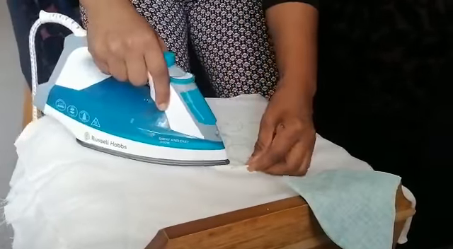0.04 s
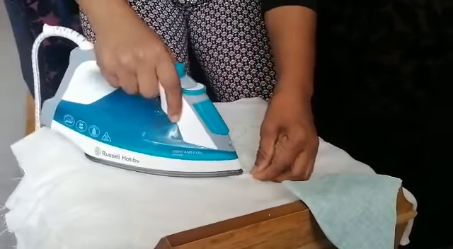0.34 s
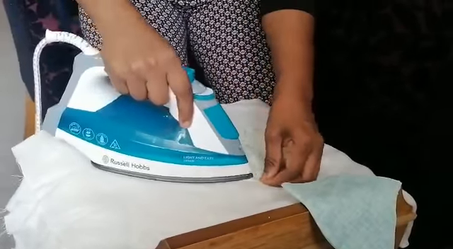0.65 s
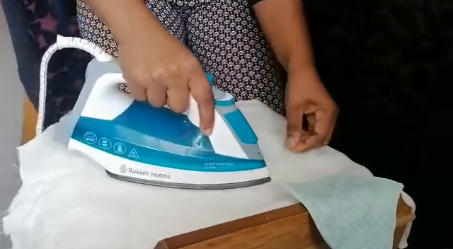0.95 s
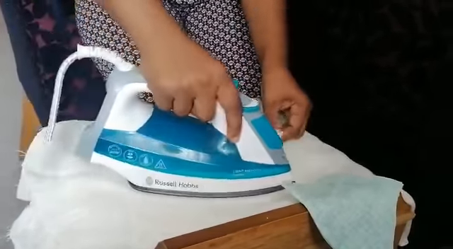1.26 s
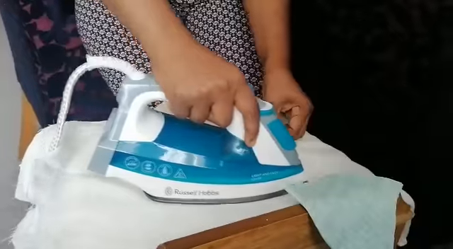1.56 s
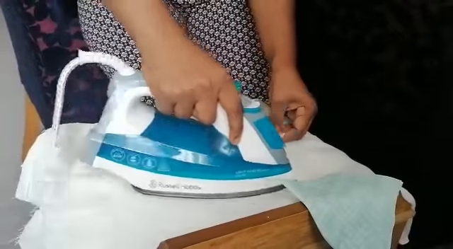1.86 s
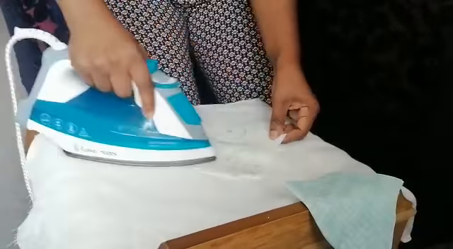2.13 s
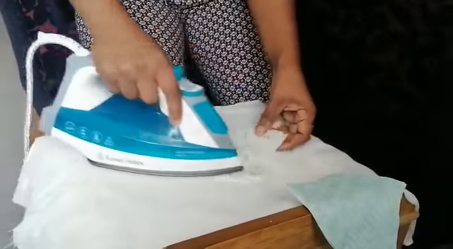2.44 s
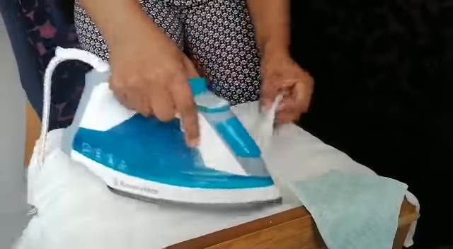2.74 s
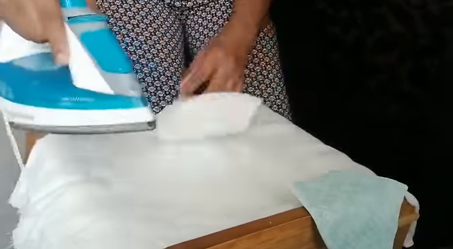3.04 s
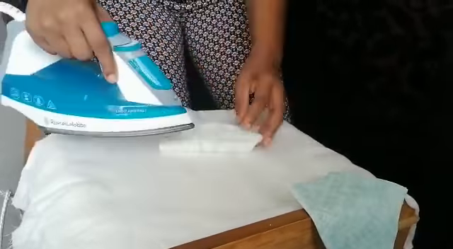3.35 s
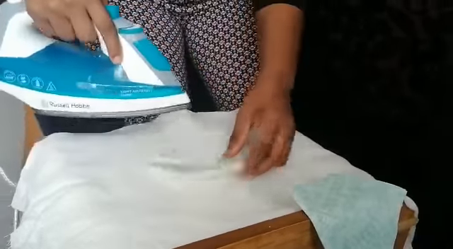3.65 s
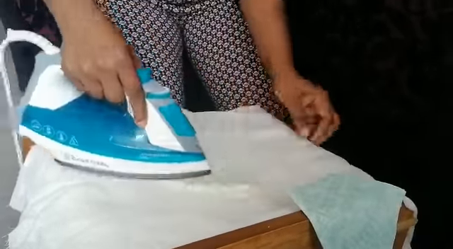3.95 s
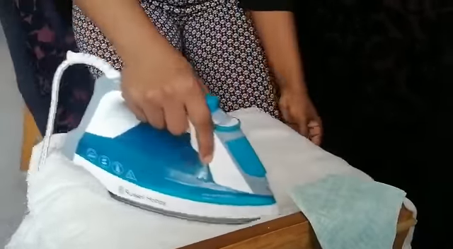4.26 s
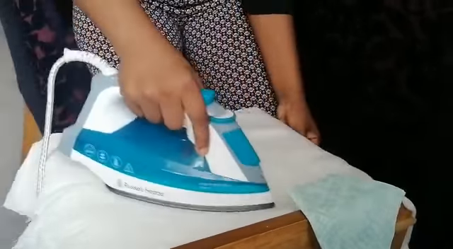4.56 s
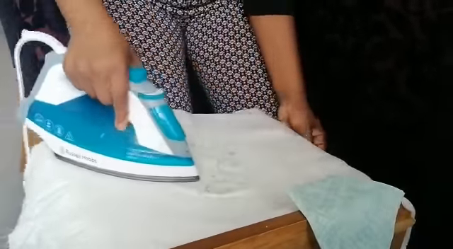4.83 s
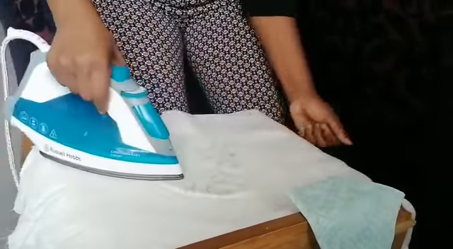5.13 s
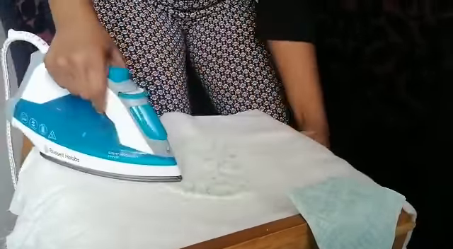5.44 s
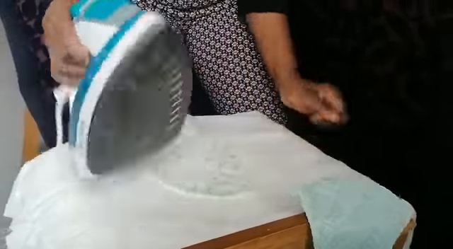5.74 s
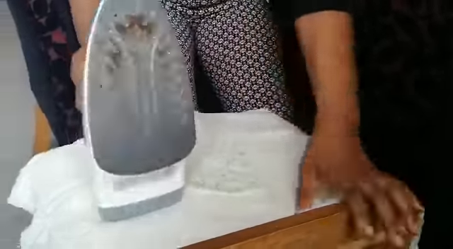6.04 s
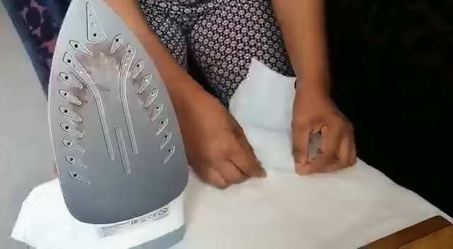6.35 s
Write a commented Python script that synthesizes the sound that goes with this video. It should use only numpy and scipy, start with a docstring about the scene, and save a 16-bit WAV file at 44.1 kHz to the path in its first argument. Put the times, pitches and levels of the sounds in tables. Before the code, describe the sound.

Faint swishes of ironing and small plastic ticks, with a dull thump, a sharp wooden knock and a final rattle in a small room.

```python
"""A steam iron hisses over cloth in strokes, by friction, above a constant low rumble and faint whine.
Impacts excite damped modes: the plastic shell clacks and ticks, and the padded wooden board thumps
as the iron lands. Late on, the iron bangs on hard wood and judders onto its heel; two dry snaps follow.
The sound is picked up close by, on a phone, with the short reverberation of a small room."""
import sys
import numpy as np
from scipy import signal
from scipy.fft import rfft, irfft
from scipy.io import wavfile
from scipy.ndimage import uniform_filter1d

SR = 44100
rng = np.random.default_rng(int(sys.argv[2]) if len(sys.argv) > 2 else 0)


def master(y):
    """Save y as 16-bit WAV."""
    cut = np.clip(np.atleast_2d(y).T, -1, 1)
    pcm = np.round(cut * 32767)  # scale
    wavfile.write(sys.argv[1], SR, pcm.astype(np.int16))


N = 281975
TIME = np.arange(N) / SR
AGE = TIME[:SR // 2]  # time since an impact, s

# spectra of the room tone and of cloth friction: f/Hz, relative spectral level/dB
ROOM_SPECTRUM = [(20, -8), (47, 3), (64, -2), (125, -15.5), (180, -6.5), (240, -18.5), (300, -11),
                 (450, -23), (1020, -15.5), (1300, -25), (1900, -28), (2700, -31), (4000, -36.5),
                 (7500, -45)]
CLOTH_SPECTRUM = [(500, -19), (1000, 6), (1800, -14.5), (2250, 0.5), (2700, 5.5), (3300, 3), (4700, -2.5),
                  (5500, 1.5), (7000, -5.5), (8000, -35)]
# tracks of the thin whine, the falling squeak and the fizz around the snaps: t/s, f/Hz, level/dB
WHINE_TRACK = [(0, 2192, -78.5), (6.07, 2214, -83), (6.10, 2130, -78), (6.39, 2130, -71)]
SQUEAK_TRACK = [(3.04, 1644, -80), (3.12, 1617, -67), (3.18, 1480, -65.5), (3.25, 1427, -77)]
FIZZ_TRACK = [(6.083, 3950, -52), (6.125, 4000, -61.5), (6.16, 3930, -81)]

# normal modes of each struck body: f/Hz, relative level/dB, 60 dB decay time/s
CLICK_MODES = [(2046, -14, 0.016), (2750, 5, 0.0053), (2950, 3.5, 0.0058), (3440, -13, 0.0048),
               (6700, 8, 0.002)]
SNAP_MODES = [(547, -5.5, 0.0094), (865, 6, 0.0058), (1700, 4.5, 0.0078), (1770, 4, 0.0034),
              (3770, -4, 0.0064), (4340, -12, 0.0069)]
HEEL_MODES = [(130, -2, 0.043), (280, 13.5, 0.019), (471, 5.5, 0.056), (674, 5, 0.027), (814, 2.5, 0.042),
              (930, -18, 0.026)]
SHELL_MODES = [(296, 1, 0.056), (381, -2, 0.021), (445, 4.5, 0.028), (618, -2, 0.03), (690, 7.5, 0.016),
               (880, 4.5, 0.045), (1043, 0.5, 0.077), (1380, 7, 0.012), (1844, 1.5, 0.035),
               (2030, 2.5, 0.023), (2544, -13.5, 0.23), (3180, -10.5, 0.026), (4044, -2, 0.016),
               (5050, -25, .04)]
WOOD_MODES = [(206, -12, 0.2), (267, -10, 0.24), (326, 8, 0.036), (443, 10, 0.026), (465.4, -21, 0.13),
              (548, -12, 0.089), (750, -16.5, 0.13), (755, -1, 0.027), (1016, -14.5, 0.12),
              (1165, -20.5, 0.033), (1554, -23.5, 0.19), (1712, 0.5, 0.025), (2070, -4, 0.027)]
BOARD_MODES = [(117.6, 1.5, 0.3), (161.8, 1.5, 0.15), (207.2, -8, 0.25), (265, 4, 0.14)]

# a small dry click: t/s, level/dB
CLICKS = [(0.8394, -47.5)]
# dry snaps: t/s, relative level/dB
SNAPS = [(6.0945, -13.5), (6.1145, -20)]
# strokes of the soleplate over the cloth: start t/s, fastest t/s, end t/s, hiss level/dB
STROKES = [(-.15, 0.154, 1.1, -74.5), (0.893, 1.118, 1.29, -63.5), (1.22, 1.523, 1.87, -69),
           (1.72, 2.178, 2.75, -70), (2.253, 2.53, 2.9, -70), (4.01, 4.044, 4.8, -65),
           (4.35, 4.803, 5.21, -71.5), (5.123, 5.29, 5.55, -75.5), (5.526, 5.64, 5.81, -66.5),
           (5.88, 5.95, 6.05, -60)]
# creaking of the handle as it is steered or tipped: start t/s, end t/s, tick rate/Hz, level/dB
CREAKS = [(1.402, 3.35, 5, -67), (5.609, 5.73, 70, -56)]
# short pitched ticks, some alone, some with a clack: t/s, level/dB, f/Hz, grit re tone/dB
TICKS = [(1.287, -43, 690, -14), (1.371, -45.5, 950, -13), (1.488, -53.5, 2870, -23),
         (1.856, -61.5, 3100, -20), (2.291, -44, 3290, -18), (2.292, -43, 1114, -24),
         (2.318, -46, 2430, -14.5), (2.687, -48.5, 1980, -13), (2.705, -54, 4720, -18),
         (2.932, -59.5, 3350, -30), (2.997, -60, 4850, -4), (3.163, -61.5, 4070, 0), (4.026, -50, 3900, -5),
         (4.479, -52.5, 2160, -30), (5.010, -43, 472, -32.5), (5.607, -50.5, 1470, -7),
         (5.641, -46, 1720, -1.5), (5.715, -51.5, 2640, -20), (5.809, -56.5, 2870, -8.5),
         (5.865, -43.5, 2950, -35), (5.909, -42.5, 3700, -12), (5.917, -40, 2510, -25),
         (5.936, -47.5, 5040, -4), (6.054, -44.5, 2760, -7)]
# shell clacks; harder contact is brighter, a loose part lifts the middle registers:
# t/s, base level/dB, tilt per register/dB, middle lift/dB
CLACKS = [(1.287, -50, -4, 0), (1.295, -38.5, 2.5, -3), (1.301, -49, 0.5, -4), (1.384, -57.5, 1.5, 1.5),
          (1.786, -60, -3.5, -1.5), (2.292, -59, 1, 13), (2.317, -51.5, 1.5, 4.5), (2.698, -48.5, -3.5, -4),
          (2.715, -55, -0.5, 5.5), (2.741, -57.5, -8, 5), (2.907, -72.5, -11, 5.5), (3.091, -64.5, -7, -5),
          (3.133, -68, -8.5, 7), (5.008, -52.5, -2, -5), (5.861, -56, -7, 0.5), (5.906, -39, -1.5, -12),
          (5.927, -48.5, -8, 0.5)]
# hard blow on the wood: t/s, level of the modes/dB
BANGS = [(5.4144, -19.5)]
# soft landings on the padding: t/s, level/dB, f/Hz
LANDINGS = [(1.35, -48.5, 274), (1.383, -46.5, 246), (1.797, -52, 244), (2.127, -54, 173),
            (4.025, -19, 239), (4.403, -45.5, 283), (5.902, -30.5, 132)]

# boundaries between the four registers: f/Hz
BAND_EDGES_HZ = [600, 1400, 3200]
# the shell's own balance in those registers, low to high: relative level/dB
SHELL_BALANCE_DB = [-1.1, -0.77, 1, -2.8]
TOP_HZ = 7450


def amp(db):
    """Amplitude ratio of a level in decibels."""
    return 10 ** (np.asarray(db) / 20)


def level(x, db):
    """Normalisation to an rms level."""
    return x * amp(db) / np.sqrt(np.mean(x ** 2))


def peak(x, db):
    """Normalisation to the rms level of the loudest 4 ms."""
    power = uniform_filter1d(x ** 2, size=SR // 250, mode="constant")
    return x * amp(db) / np.sqrt(power.max())


def add(out, s, x):
    """Superposition of a sound starting at time s."""
    start = int(s * SR)
    out[start:start + len(x)] += x[:N - start]


def colour(x, points):
    """Spectral shaping by (f/Hz, level/dB) points, interpolated in log frequency."""
    hz, db = np.transpose(points)
    bins = np.maximum(np.fft.rfftfreq(len(x), 1 / SR), 1)
    return irfft(rfft(x) * amp(np.interp(np.log(bins), np.log(hz), db)), len(x))


def butter(x, hz, kind, order=2):
    """Causal filtering with a maximally flat passband."""
    return signal.sosfilt(signal.butter(order, hz, kind, fs=SR, output="sos"), x)


def registers(x):
    """Band splitting into four registers, low to high."""
    low, mid, high = BAND_EDGES_HZ
    upper = [butter(x, band, "band", order=3) for band in ([low, mid], [mid, high], [high, TOP_HZ])]
    return [butter(x, low, "low", order=4)] + upper


def fade(t60):
    """Exponential decay, 60 dB in t60 seconds."""
    return np.exp(-np.log(1000) * AGE / t60)


def walk(rate_hz):
    """Slow random modulation: linear interpolation between Gaussian values."""
    steps = rng.standard_normal(N // 100)
    return 0.55 * np.interp(TIME * rate_hz, np.arange(len(steps)), steps)


def ring(modes, detune=0):
    """Free vibration as a sum of damped modes; the grip detunes them slightly."""
    return sum(amp(db) * fade(t60) * np.sin(2 * np.pi * hz * (1 + detune * rng.standard_normal()) * AGE)
               for hz, db, t60 in modes)


def taps(events, modes, rise_s, detune=0):
    """Impact excitation: each blow rings the same modes with a finite rise time."""
    out = np.zeros(N)
    for s, db in events:
        add(out, s, peak(ring(modes, detune) * (1 - fade(rise_s)), db))
    return out


def wavering(track, width_hz, steady=0):
    """Narrow-band noise: a gliding carrier, randomly modulated, with an optional steady core."""
    s, hz, db = np.transpose(track)
    phase = 2 * np.pi * np.cumsum(np.interp(TIME, s, hz)) / SR
    flutter = butter(rng.standard_normal(N) + 1j * rng.standard_normal(N), width_hz / 2, "low")
    tone = np.real((steady + flutter / np.std(flutter)) * np.exp(1j * phase))
    gain = amp(np.interp(TIME, s, db, left=-np.inf, right=-np.inf))
    return level(tone, 0) * gain


def room_tone():
    """Ambient noise: rumble and rush, independently modulated in amplitude, with a thin whine."""
    air = colour(rng.standard_normal(N), ROOM_SPECTRUM)
    rumble = butter(air, 100, "low", order=1)
    rush = air - rumble
    restless = rumble * amp(1.9 * walk(11)) + rush * amp(.5 * walk(3.5))
    return level(restless, -59.5) + wavering(WHINE_TRACK, width_hz=90, steady=1.0)


def reverberation(x, wet_db=(-9, -9, -9, -11), t60_s=(.36, .33, .3, .25)):
    """A diffuse field builds up after the direct sound and decays fastest in the treble."""
    response = 0
    for band, db, t60 in zip(registers(rng.standard_normal(len(AGE))), wet_db, t60_s):
        envelope = fade(t60) * (1 - fade(0.051)) ** 2
        response += amp(db) * band * envelope / np.sqrt(np.sum(envelope ** 2))
    return signal.fftconvolve(x, response)[:N]


def squeak():
    """A faint, noisy resonance sinks in pitch as the iron is lifted away."""
    return wavering(SQUEAK_TRACK, width_hz=125)


def click():
    """Heavy damping of high modes leaves one small click."""
    return taps(CLICKS, CLICK_MODES, rise_s=.002, detune=0.014)


def snaps():
    """Two heavily damped transients sound as dull snaps within a short fizz of band noise."""
    pair = butter(taps(SNAPS, SNAP_MODES, rise_s=0.033), [450, 4800], "band", order=3)
    return amp(-10) * pair + wavering(FIZZ_TRACK, width_hz=620)


def tick(db, hz, grit_db):
    """Stick-slip: a plastic joint yields in rapid jerks that ring three close modes and spray grit."""
    jerks = rng.standard_normal(len(AGE)) ** 3 * fade(0.034) * (1 - fade(0.0046))
    joint = ring([(hz, 0, .019), (hz * 0.78, -5, .007), (hz * 0.95, -6, .007)], detune=0.0043)
    tone = signal.fftconvolve(jerks, joint)[:len(AGE)]
    grit = butter(jerks, [1700, 5400], "band", order=4)
    return peak(peak(tone, 0) + peak(grit, grit_db), db)


def handle_creaks(centre_hz=2930, spread_octaves=0.25, scatter_db=0.5):
    """Strain release: the handle lets go in unevenly spaced ticks of random pitch."""
    out = np.zeros(N)
    for start, end, rate, db in CREAKS:
        for s in np.arange(start, end, 1 / rate):
            softness, pitch = np.clip(rng.standard_normal(2), -2, 2)
            hz = centre_hz * 2 ** (spread_octaves * pitch)
            onset = s + rng.random() / (2 * rate)
            add(out, onset, tick(db - scatter_db * softness, hz, grit_db=-6))
    return out


def pitched_ticks():
    """Brief resonances: ticks, chirps and gritty cracks, some alone, some ringing with a clack."""
    out = np.zeros(N)
    for s, db, hz, grit_db in TICKS:
        add(out, s, tick(db, hz, grit_db))
    return out


def cloth_friction(speed_exponent=0.78):
    """Sliding friction: threads catch and slip under the soleplate; the hiss is a power law of speed."""
    power = np.zeros(N)
    for start, fastest, end, db in STROKES:
        speed = np.sin(np.pi / 2 * np.interp(TIME, [start, fastest, end], [0, 1, 0])) ** 2
        power += (amp(db) * speed ** speed_exponent) ** 2
    grains = rng.standard_normal(N) * amp(1.3 * rng.standard_normal(N))
    hiss = level(colour(grains, CLOTH_SPECTRUM), 0)
    return hiss * np.sqrt(power) * amp(0.6 * walk(28))


def heel_judder(start_s=6.040, first_gap_s=0.0065, slowing=1.15, first_db=-30, fall_db=0.84):
    """Repeated impact: the heel rocks on the board in blows that spread out and weaken ever faster."""
    blow = np.arange(6)
    times = start_s + first_gap_s * blow ** slowing
    levels = first_db - fall_db * blow ** 2
    return taps(zip(times, levels), HEEL_MODES, rise_s=0.012, detune=0.035)


def shell_clacks(events, chatter_db=13):
    """Impact sets the shell's modes in free vibration while loose parts chatter briefly."""
    out = np.zeros(N)
    from_middle = np.array([-1.5, -0.5, 0.5, 1.5])  # in registers
    is_middle = np.abs(from_middle) < 1
    for s, db, tilt_db, lift_db in events:
        chatter = butter(rng.standard_normal(len(AGE)), [260, 4300], "band", order=3) * fade(0.034)
        blow = (ring(SHELL_MODES, detune=0.032) + amp(chatter_db) * chatter) * (1 - fade(0.0061))
        levels = db + np.array(SHELL_BALANCE_DB) + tilt_db * from_middle + lift_db * is_middle
        add(out, s, sum(peak(band, band_db) for band, band_db in zip(registers(blow), levels)))
    return out


def wood_bang(rattle_db=-6):
    """Hard contact excites the wood's hollow modes under a burst of rattling parts."""
    out = taps(BANGS, WOOD_MODES, rise_s=0.031)
    for s, db in BANGS:
        rattle = rng.standard_normal(len(AGE)) * fade(0.046) * (1 - fade(0.0089))
        add(out, s, peak(butter(rattle, [260, 2200], "band", order=5), db + rattle_db))
    return butter(out, 160, "high")


def cushioned_pulse(hz, tau_s):
    """A compliant contact yields a few low cycles that swell and die."""
    return (AGE / tau_s) ** 3 * np.exp(-AGE / tau_s) * np.sin(2 * np.pi * hz * AGE)


def board_thumps(hum_db=-10, settle_s=0.14, sway_at_s=5.903):
    """Padding prolongs contact, giving a low thump; the board hums until the iron's weight damps it."""
    out = np.zeros(N)
    damping = np.exp(-(AGE / settle_s) ** 4)
    hum = peak(ring(BOARD_MODES) * (1 - fade(0.23)) * damping, hum_db)
    for s, db, hz in LANDINGS:
        thump = peak(cushioned_pulse(hz, tau_s=.0021), 0)
        add(out, s, peak(thump + hum, db))
    # the board sways once as it takes the weight of the upright iron
    add(out, sway_at_s, peak(cushioned_pulse(hz=46.2, tau_s=.021), -44.5))
    return out


def scene(jolt_db=-23, jolt_tilt_db=0, jolt_lift_db=4):
    """Superposition in one channel of all direct sound and the reverberation of iron and board."""
    bed = cloth_friction() + squeak() + room_tone()
    wood = wood_bang()
    thumps = board_thumps()
    close = click() + heel_judder() + snaps()
    # the blow on the wood jolts the shell too
    jolts = [(s, db + jolt_db, jolt_tilt_db, jolt_lift_db) for s, db in BANGS]
    plastic = shell_clacks(CLACKS + jolts) + pitched_ticks() + handle_creaks()
    echo = reverberation(plastic + amp(0.5) * wood + amp(-0.5) * thumps)
    return (plastic + wood + thumps + close + echo + bed)[None]


def record(dry):
    """Band limiting: the phone cuts the treble steeply above TOP_HZ."""
    return signal.sosfilt(signal.ellip(10, .2, 70, TOP_HZ, fs=SR, output="sos"), dry)


dry = scene()
out = record(dry)
master(out)
```